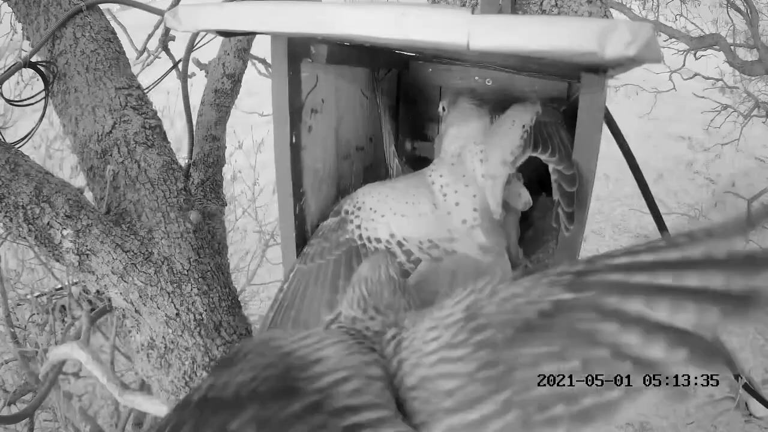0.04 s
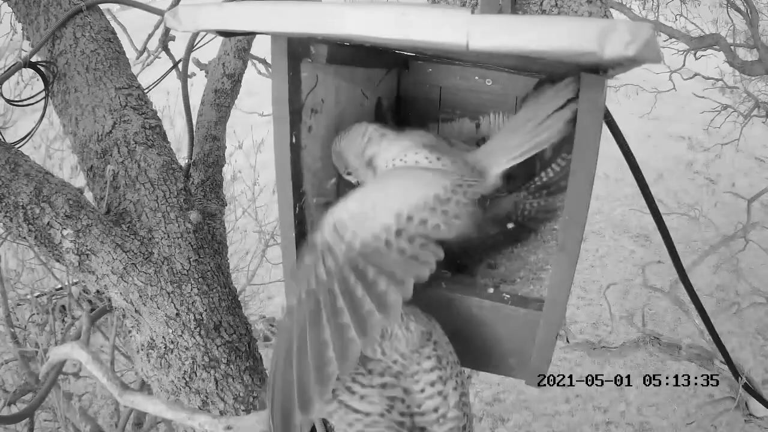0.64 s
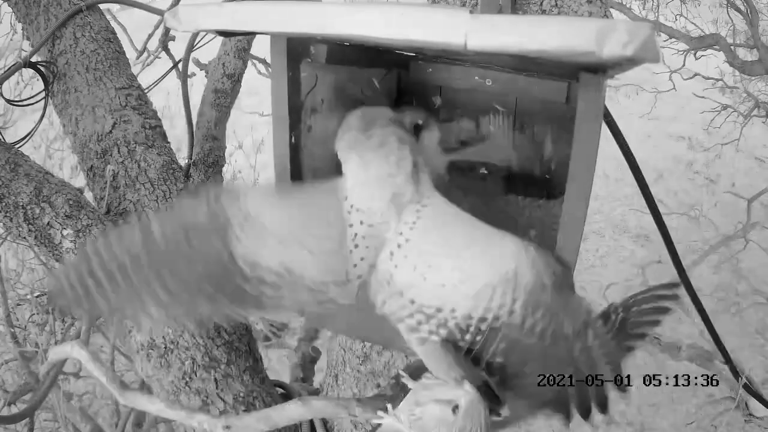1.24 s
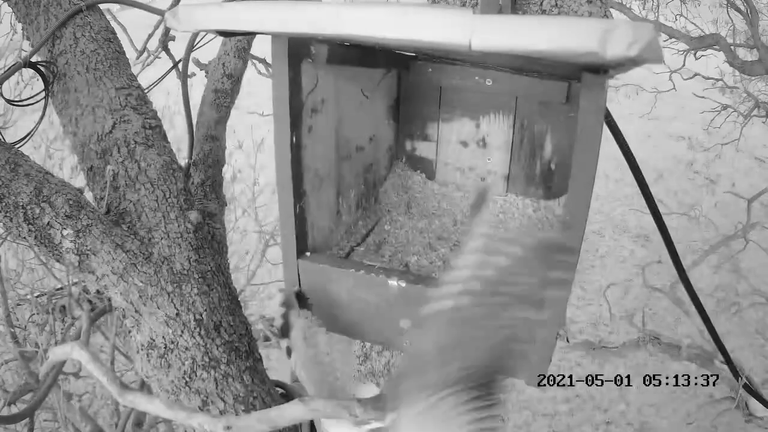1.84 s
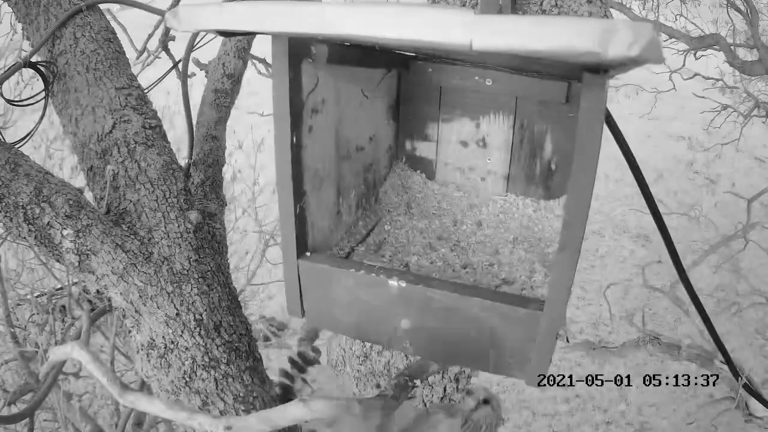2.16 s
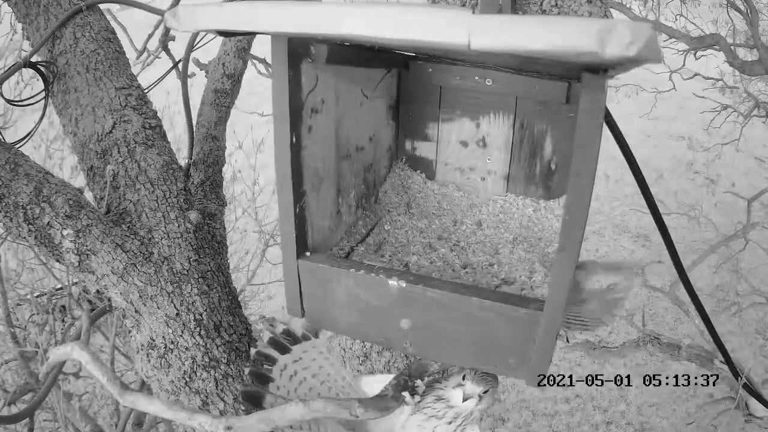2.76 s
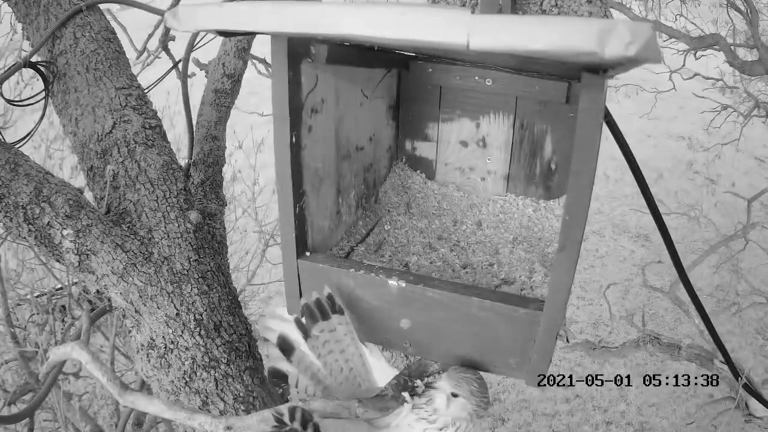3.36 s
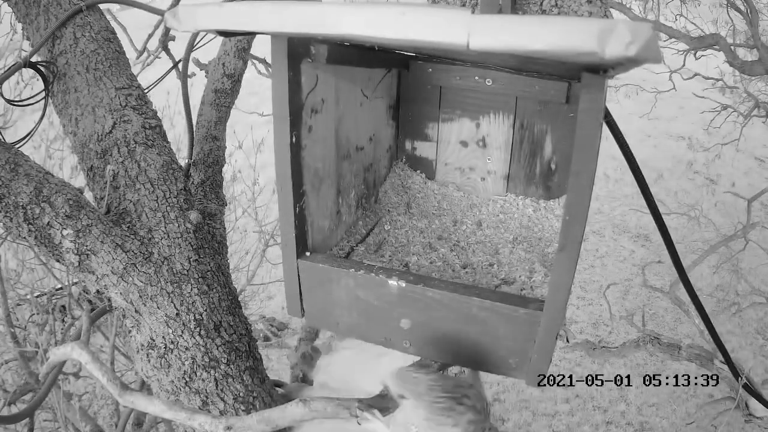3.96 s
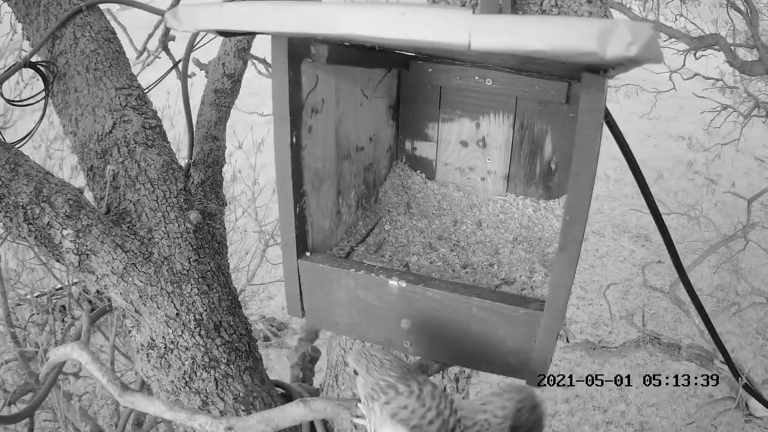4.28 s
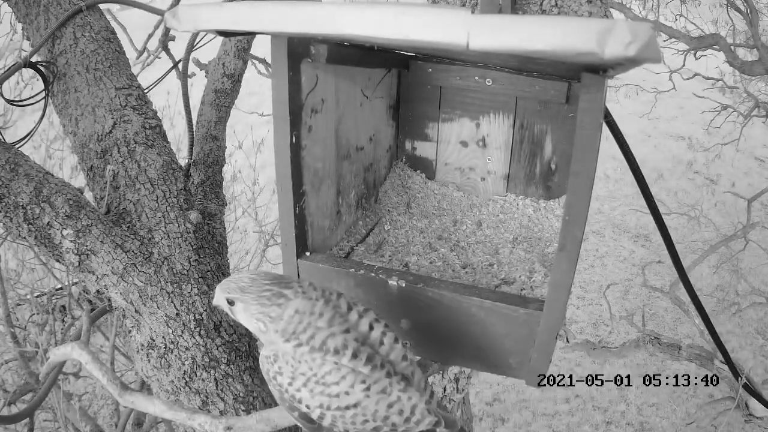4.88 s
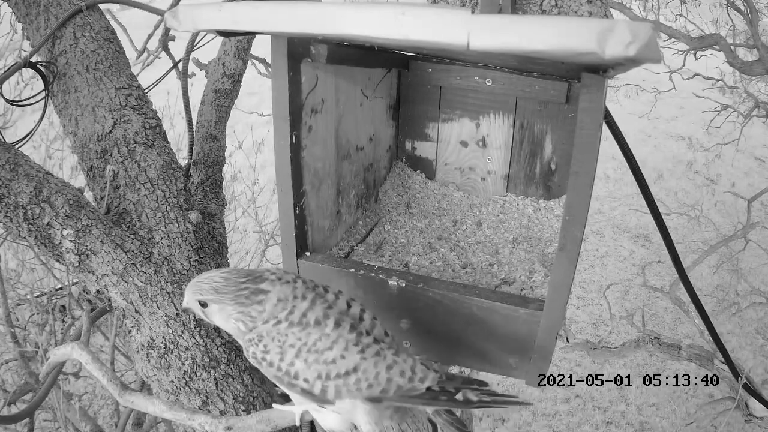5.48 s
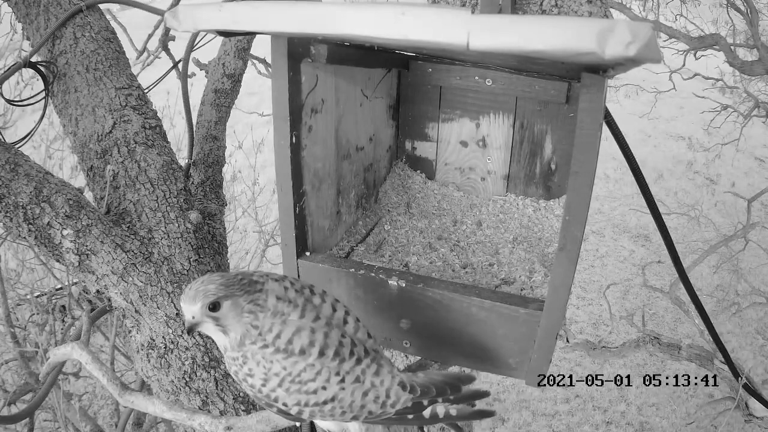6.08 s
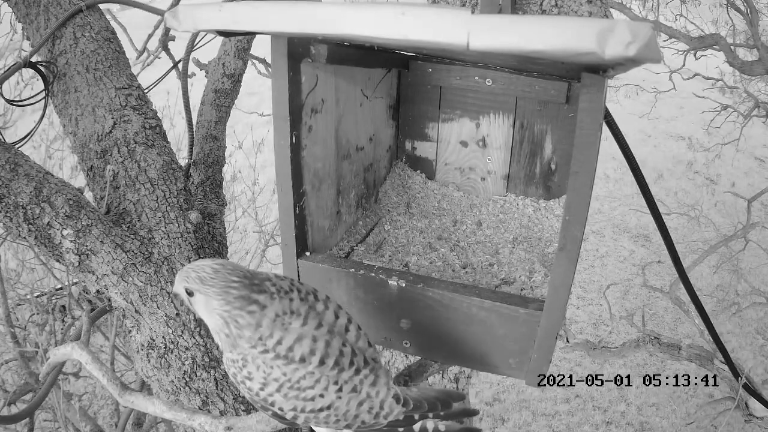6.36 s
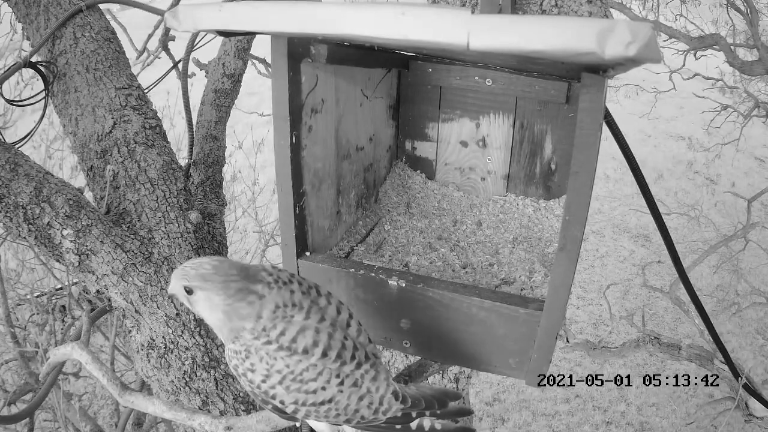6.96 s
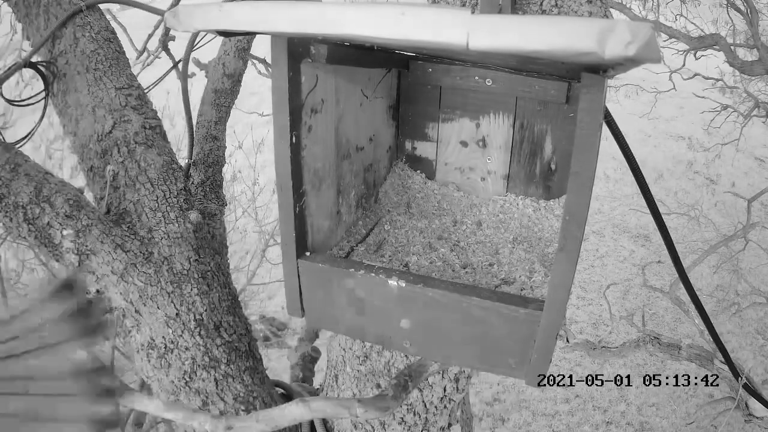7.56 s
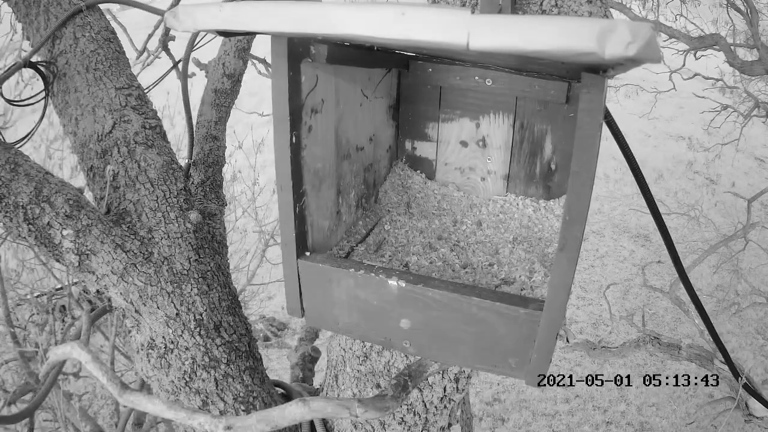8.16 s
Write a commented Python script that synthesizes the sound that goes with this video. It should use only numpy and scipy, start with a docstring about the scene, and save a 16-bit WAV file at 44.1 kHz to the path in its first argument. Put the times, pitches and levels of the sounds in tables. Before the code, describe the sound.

Two kestrels scream harshly and scuffle with beating wings at a wooden nest box, then scold each other in rapid, repeated calls.

```python
"""Two kestrels fight at a wooden nest box, close to the microphone, with harsh, broken screams.
Each voice is a strained syrinx tone that roughens and doubles its period, coloured by the throat.
Feathers rustle; wings and claws ring the boards. The birds tumble below the box and scold in long
'kee-kee-kee' series, one perched near, its rival farther off, then the perched one flies away.
Box and trunk answer quickly, the trees give a short echo, and a cuckoo calls far off in still air."""
import sys
import numpy as np
from scipy import signal
from scipy.fft import rfft, irfft, next_fast_len
from scipy.io import wavfile
from scipy.ndimage import uniform_filter1d, map_coordinates

SR = 44100
rng = np.random.default_rng(int(sys.argv[2]) if len(sys.argv) > 2 else 0)


def persist_wave(psi):
    """Save psi, clipped to +-1, as 16-bit WAV."""
    counts = np.round(np.clip(psi, -1, 1) * 32767).astype(np.int16)
    wavfile.write(sys.argv[1], SR, np.atleast_2d(counts).T)


N = 362943


def amp(db):
    return 10 ** (np.asarray(db) / 20)


def unit(x):
    """x scaled to rms 1."""
    return x / np.sqrt(np.mean(np.abs(x) ** 2) + 1e-20)


def along(points, hz):
    """A curve of (f/Hz, value) points, read on a log frequency axis."""
    freqs, values = np.transpose(points)
    return np.interp(np.log(hz + 1), np.log(freqs + 1), values)


def at(rows, s):
    """The columns of a control curve at time s."""
    times, *columns = np.transpose(rows)
    return [np.interp(s, times, column) for column in columns]


def wobble(rate, n):
    """A smooth random curve of n samples, rate knots a second."""
    knots = rng.standard_normal(int(n * rate / SR) + 4)
    return map_coordinates(knots, [np.arange(n) * rate / SR], mode="mirror")


def filtered(x, response):
    """x through a frequency response."""
    size = next_fast_len(len(x) + 8192)
    return irfft(rfft(x, size) * response(np.fft.rfftfreq(size, 1 / SR)), size)[:len(x)]


def noise(spectrum, n=N):
    """Coloured noise of rms 1."""
    return unit(filtered(rng.standard_normal(n), lambda hz: amp(along(spectrum, hz))))


def patchy(spectrum, patchy_db):
    """Noise of rms 1 whose colour shifts from moment to moment, as different feathers touch."""
    frames = signal.stft(noise(spectrum), nperseg=512)[2]
    patches = uniform_filter1d(rng.standard_normal(frames.shape), size=4, axis=0)
    patches = unit(uniform_filter1d(patches, size=4, axis=1))
    return unit(signal.istft(frames * amp(patchy_db * patches), nperseg=512)[1][:N])


def add(track, s, sound):
    """Mix a sound into the track at time s."""
    start = round(s * SR)
    part = sound[max(-start, 0):max(N - start, 0)]
    track[max(start, 0):][:len(part)] += part


def progress(length):
    """Runs from 0 to 1 over a note."""
    return np.linspace(0, 1, max(round(length * SR), 64))


def swell(u, rise, fall):
    """Soft-edged envelope of rms 1; rise and fall are shares of the note."""
    attack = np.sin(np.pi / 2 * np.clip(u / rise, 0, 1))
    release = np.sin(np.pi / 2 * np.clip((1 - u) / fall, 0, 1))
    return unit(attack * release)


def partials(pitch, multiples, rough, jitter=.028, chaos_rate=750):
    """Syrinx partials, one per row; roughness shakes the pitch and blurs each into a chaotic band."""
    n, rough = len(pitch), np.clip(rough, 0, 1)
    phase = 2 * np.pi * np.cumsum(pitch * (1 + jitter * rough * wobble(250, n))) / SR
    chaos = np.array([wobble(chaos_rate, n) + 1j * wobble(chaos_rate, n) for _ in multiples])
    blur = np.clip(rough * (multiples[:, None] / 3) ** (1 / 3), 0, 1)
    swing = np.sqrt(1 - blur ** 2) + blur * chaos * np.sqrt(.5)
    swing = unit(swing / np.sqrt(np.abs(swing)))  # the membranes limit their own swing
    return np.sqrt(2) * np.real(swing * np.exp(1j * multiples[:, None] * phase))


def overtone_db(pitch, even_hz, db_per_octave):
    """Overtones match the fundamental at even_hz; lower, they grow into the throat's resonance."""
    return np.clip(db_per_octave * np.log2(pitch / even_hz), -12, 12)


def sidebands(pitch, depth):
    """The other side of the syrinx beats unevenly against the tone."""
    beat_hz = pitch / 5 * amp(2 * wobble(70, len(pitch)))
    return 1 + depth * np.sin(2 * np.pi * np.cumsum(beat_hz) / SR)


# Resonance of a kestrel's throat: f/Hz, gain/dB
THROAT_RESPONSE = [(1100, -31), (2000, -1.5), (3000, -2.5), (4000, 7.5), (4600, 3.5), (5300, -1),
                   (6900, -19), (8000, -23), (11000, -36.5), (13000, -56)]
def voice(pitch, over_db, half_db, rough, rasp_db, tilt_db):
    """A fundamental plus throat-shaped overtones, period doubling and rasp; tilt is dB an octave."""
    def through_throat(multiples):
        column = multiples[:, None]
        gain = amp(along(THROAT_RESPONSE, column * pitch) + tilt_db * np.log2(column))
        return unit(np.sum(gain * partials(pitch, multiples, rough), axis=0))
    harmonics = np.arange(1, 7)
    fundamental = partials(pitch, harmonics[:1], .85 * rough)[0]
    rasp = noise(THROAT_RESPONSE, len(pitch))
    upper = amp(over_db) * through_throat(harmonics[1:]) + amp(half_db) * through_throat(harmonics - .5)
    return fundamental + upper + amp(rasp_db) * rough * np.sqrt(1 + np.mean(upper ** 2)) * rasp


# Screams at the box, close to the microphone:
# t/s, length/s, f/Hz, glide/share of f, broken tail/s, level/dB, roughness/0-1, period doubling/dB
FIGHT_SCREAMS = [(-.01, 0.073, 2594, -0.065, 0.025, -24.5, 0.23, -16.5),
                 (0.194, 0.063, 2528, 0.089, 0.0041, -22.5, 0.1, 3),
                 (0.257, 0.079, 2530, 0.018, 0, -27, 0.25, -3),
                 (0.315, 0.031, 2596, 0.055, 0.0037, -31, 0.82, -6),
                 (0.342, .026, 2088, -0.0024, 0.01283, -24, 0.26, -7),
                 (.461, 0.052, 2638, 0.13, 0.0029, -30, 0.12, -6.5),
                 (.53, 0.066, 2822, -0.034, 0.024, -25, 0.33, -1.5),
                 (0.727, 0.046, 2920, 0.05, 0.01, -20.5, 0.19, 1),
                 (0.798, 0.056, 2570, -0.16, 0.028, -24, 0.33, 3),
                 (.955, 0.047, 2533, -0.047, 0.016, -23, 0.16, 2),
                 (1.258, 0.036, 2256, .18, 0, -20, 0.26, -14),
                 (1.322, 0.04, 2522, -0.0685, 0.013, -12, 0.42, 12),
                 (1.47, .05, 2486, -0.044, .014, -17.5, 0.4, 1),
                 (1.622, 0.032, 2080, 0.17, 0, -25, 0.54, -7.5),
                 (1.679, 0.027, 1998, -0.07, 0.0016, -23.5, 0.42, -4),
                 (1.804, 0.0481, 2313, 0.06, 0.0051, -28, 0.8, -5),
                 (1.875, 0.044, 2110, 0.048, 0, -28.5, 0.58, -1),
                 (1.923, 0.041, 2310, -0.067, 0.026, -27.5, 0.39, -14),
                 (2.082, 0.056, 2230, -0.072, 0.013, -34.5, 0.37, -15.5)]
def screams(break_s=.0067, break_drop=.18, bow=.019, waver=.02, sag_db=6, crest=.44):
    """A ragged tone clears, doubles its period under pressure, then breaks lower and brighter."""
    out = np.zeros(N)
    for s, length, hz, glide, tail, db, rough, half_db in FIGHT_SCREAMS:
        u = progress(length)
        edge = (2 * u - 1) ** 2  # 1 at both ends, 0 midway
        broken = np.clip((tail - length * (1 - u)) / break_s, 0, 1)
        ragged = np.clip(rough * (1 + edge) + .3 * edge ** 2 + .15 * broken, 0, 1)
        arch = bow * (np.mean(edge) - edge) * (1 + rng.standard_normal())
        pitch = hz * (1 + glide * (u - .5) + arch) * (1 - break_drop * broken)
        pitch *= 1 + waver * (.8 * wobble(70, len(u)) + 2 * ragged * wobble(190, len(u)))
        over_db = overtone_db(pitch, even_hz=2272, db_per_octave=-38.5)
        doubling_db = half_db - 22 * edge ** 2 - 5 * broken
        cry = voice(pitch, over_db, doubling_db, ragged, rasp_db=-11.5, tilt_db=-4.5)
        cry *= sidebands(pitch, .53 * rough)
        cry = unit(cry / np.sqrt(1 + amp(over_db) ** 2 + amp(half_db) ** 2))
        flutter_db = (1 + 2 * ragged) * wobble(220, len(u))
        pressure = unit(swell(u, rise=.11, fall=.22) * amp(flutter_db - sag_db * np.abs(u - crest)))
        add(out, s, amp(db) * pressure * cry)
    return out


# Feathers brushing close by: f/Hz, level/dB
FEATHER_SPECTRUM = [(40, -20.5), (280, -2.5), (1300, 0), (2500, -5), (4500, -17), (7000, -40), (13000, -44)]
# Air pushed against the microphone: f/Hz, level/dB
DRAUGHT_SPECTRUM = [(40, -4.5), (90, -17), (9000, -73)]
# Rustle of the struggle at the box: t/s, level/dB
RUSTLE_CURVE = [(0.0, -47), (0.601, -58), (1.001, -41), (1.058, -54.5), (1.47, -47.5), (2.032, -44.5),
                (2.13, -51.5), (2.341, -70), (2.897, -69.5)]
# Wing strokes that fan the microphone, the last two at take-off: t/s, level/dB
WING_STROKES = [(1.585, -35), (7.488, -40), (7.608, -35)]
def wings():
    """Feathers brush in short, separate scratches and fan the microphone."""
    rustle = amp(np.interp(np.arange(N) / SR, *np.transpose(RUSTLE_CURVE), right=-120))
    flaps = unit(amp(7 * np.tanh(wobble(55, N))))
    grain = unit(amp(4.5 * wobble(400, N)))
    draught = amp(-11) * rustle
    u = progress(.2006)
    for s, db in WING_STROKES:
        add(draught, s, amp(db - 34.4 * u) * swell(u, rise=.025, fall=.25))
    scratches = rustle * flaps * grain * patchy(FEATHER_SPECTRUM, patchy_db=5.5)
    return scratches + draught * noise(DRAUGHT_SPECTRUM)


# Short chips close by: t/s, length/s, f/Hz, glide/share of f, level/dB
CHIP_NOTES = [(0.088, 0.019, 1134, -0.079, -38), (0.174, 0.013, 2300, 0.26, -34.5),
              (0.413, 0.028, 1290, 0.17, -41.5), (0.439, 0.0219, 1124, -0.21, -36.5),
              (0.599, 0.0624, 1008, -0.23, -41), (0.858, 0.031, 882, -0.15, -35),
              (.696, 0.014, 2366, 0.31, -35), (1.062, 0.0541, 1105, 0.17, -38.5),
              (2.79, 0.016, 1520, -0.109, -27), (4.809, .0153, 1441, -0.008, -30.5),
              (6.017, 0.021, 1105, 0.21, -36.5), (6.175, 0.038, 1030, 0.25, -41.5),
              (6.213, 0.022, 1127, -0.16, -33.5)]
def chips(even_hz=1259.5, rough_per_s=27):
    """Abrupt low notes whose upper partials fall away quickly; the long ones get ragged."""
    out, harmonics = np.zeros(N), np.arange(1, 8)
    for s, length, hz, glide, db in CHIP_NOTES:
        u = progress(length)
        second_db = overtone_db(hz, even_hz, db_per_octave=-16)
        upper_db = second_db - 14 - 10 * (harmonics[2:] - 3) * hz / even_hz
        pitch = hz * (1 + glide * (u - .5))
        rough = min(rough_per_s * length, .5)
        chip = amp(np.r_[0, second_db, upper_db]) @ partials(pitch, harmonics, rough)
        add(out, s, amp(db) * swell(u, rise=.27, fall=.27) * unit(chip))
    return out


# Wings and claws on the box, beside the microphone, the last one just below it: t/s, level/dB, contact t60/s,
# board ring/dB
BOX_BLOWS = [(0.328, -43, 0.039, -35), (1.054, -35.5, 0.04, -29), (1.162, -12, 0.011, -39),
             (1.239, -26, 0.04, -37.5), (1.262, -35, 0.069, -28), (1.433, -27, 0.057, -26.5),
             (1.474, -29, 0.054, -33), (1.523, -26.5, 0.034, -39.5), (1.582, -14.5, 0.015, -35.5),
             (1.6, -28, 0.082, -34.5), (1.825, -27, 0.046, -45)]
def blows(box_hz=247, box_t60=.11, claw_t60=.025):
    """A crunch of feathers rings the boards and pushes air; the shortest blows are claws and click."""
    force, claws, boards = np.zeros((3, N))
    t = np.arange(SR // 6) / SR
    for s, db, t60, boards_db in BOX_BLOWS:
        decay = amp(-60 * t / t60) + amp(-26 - 60 * t / (3 * t60))
        contact = (1 - np.exp(-t / .0015)) * decay * amp(3.5 * wobble(200, len(t)))
        add(force, s, amp(db) * contact)
        if t60 < claw_t60:
            add(claws, s, amp(db - 28.5) * contact)
        ring = amp(-60 * t / box_t60) * np.sin(2 * np.pi * box_hz * t + 1.3 * wobble(60, len(t)))
        add(boards, s, amp(boards_db) * (1 - np.exp(-t / .0013)) * ring)
    crunch = patchy(FEATHER_SPECTRUM, patchy_db=1)
    clicks = claws * rng.standard_normal(N)
    return boards + clicks + force * (crunch + amp(-14.5) * noise(DRAUGHT_SPECTRUM))


# Feet and wing tips on nearby wood: t/s, f/Hz, level/dB, t60/s
LIGHT_KNOCKS = [(1.193, 865, -33.5, 0.027), (2.592, 817, -41.5, 0.085), (3.821, 956, -45.5, 0.069),
                (3.955, 803, -48, 0.073), (4.304, 1104, -44.5, 0.048)]
# Modes of that wood: multiple of f, level/dB
WOOD_MODES = [(.6, 4.5), (1, 5), (1.5, -8)]
def knocks():
    """Each knock rings a few damped, blurred modes of the wood it lands on."""
    out, t = np.zeros(N), np.arange(SR // 6) / SR
    for s, hz, db, t60 in LIGHT_KNOCKS:
        ring = sum(amp(mode_db) * np.sin(2 * np.pi * multiple * hz * t + wobble(10 / t60, len(t)))
                   for multiple, mode_db in WOOD_MODES)
        add(out, s, amp(db - 60 * t / t60) * (1 - np.exp(-20 * t / t60)) * ring)
    return out


# Thin squeaks over the close cries: t/s, length/s, f/Hz, level/dB
HIGH_SQUEAKS = [(1.253, 0.0094, 5310, -31.5), (1.317, 0.015, 5480, -24.5), (1.666, 0.028, 5100, -36),
                (7.002, 0.029, 5260, -43.5)]
def squeaks(drop=.086):
    """The other side of the syrinx slips in with a high, falling whistle of its own."""
    out = np.zeros(N)
    for s, length, hz, db in HIGH_SQUEAKS:
        u = progress(length)
        whistle = partials(hz * (1 - drop * (u - .5)), np.ones(1), rough=.067)[0]
        add(out, s, amp(db) * swell(u, rise=.63, fall=.57) * whistle)
    return out


# Feathers heard from below the box: f/Hz, level/dB
MUFFLED_SPECTRUM = [(40, -5), (170, -9.5), (280, -1), (1250, -5), (1800, -22), (6000, -60)]
# Wing beats below the box: t/s, thump/dB, t60/s, quill crackle/dB
WING_BEATS = [(2.1, -19, 0.031, -42), (2.255, -38.5, 0.05, -33.5), (2.311, -48, 0.076, -38.5),
              (3.473, -47, 0.099, -57), (3.647, -35.5, 0.15, -70.5), (3.844, -40, 0.13, -45.5),
              (3.873, -23, 0.035, -38), (4.102, -41, 0.26, -57.5), (4.248, -28.5, 0.051, -34),
              (4.395, -38.5, 0.12, -35)]
def tussle(attack_s=.005):
    """Wings beat unevenly: a muffled thump each time, and a crackle where the quills scrape."""
    force, scrape = np.zeros((2, N))
    t = np.arange(SR // 6) / SR
    for s, db, t60, quills_db in WING_BEATS:
        beat = (1 - np.exp(-t / attack_s)) * amp(-60 * t / t60)
        add(force, s, amp(db) * beat)
        add(scrape, s, amp(quills_db) * beat)
    thumps = force * unit(amp(5 * wobble(200, N))) * patchy(MUFFLED_SPECTRUM, patchy_db=5)
    crackle = scrape * unit(amp(5.4 * wobble(600, N))) * noise(FEATHER_SPECTRUM)
    return thumps + crackle


# A cuckoo far from the box: t/s, level/dB
CUCKOO_CALLS = [(2.81, -75), (5.28, -63.5), (6.48, -63.5), (7.68, -66.5)]
# Its two notes: delay/s, length/s, f/Hz
CUCKOO_SYLLABLES = [(0, 0.12, 637.7), (0.259, 0.15, 525.6)]
def cuckoo():
    """Soft, nearly pure notes that sag a little, blurred by distance."""
    out = np.zeros(N)
    for delay, length, hz in CUCKOO_SYLLABLES:
        u = progress(length)
        pitch = hz * (1 - .04 * (u - .5) + .028 * wobble(80, len(u)))
        note = swell(u, rise=.33, fall=.58) * np.sin(2 * np.pi * np.cumsum(pitch) / SR)
        for s, db in CUCKOO_CALLS:
            add(out, s + delay, amp(db) * note)
    return out


# The rival's two series, farther from the microphone: start/s, end/s, first gap/s, gap change per call/s
RIVAL_SERIES = [(3.218, 5.63, .157, -.00014), (6.515, 8.16, .167, .0015)]
# Its effort: t/s, fundamental level/dB, top f/Hz
RIVAL_EFFORT = [(3.2, -55, 2239), (3.8, -63.5, 2335), (4.8, -65, 2250), (5.3, -54, 2376), (7, -54.5, 2359),
                (8.1, -54, 2287)]
def rival(call_s=.114, leap=.17, leap_s=.011, slide=.21, slide_from=.28):
    """Even series of calls that leap up, then slide down and grow hoarse on the way."""
    out, u = np.zeros(N), progress(call_s)
    sliding = np.maximum(u - slide_from, 0) / (1 - slide_from)
    rough = .17 + .6 * sliding ** 1.5 + .6 * (1 - u) ** 12
    contour = 1 - leap * np.exp(-u * call_s / leap_s) - slide * sliding ** 1.25
    for s, end, gap, growth in RIVAL_SERIES:
        while s < end:
            db, top_hz = at(RIVAL_EFFORT, s)
            pitch = top_hz * (contour + .01 * wobble(12, len(u)) + .03 * rough * wobble(250, len(u)))
            tilt_db = np.interp(s, [4.5, 6.5], [-4, 2])  # later calls are brighter
            call = voice(pitch, over_db=7.5, half_db=-39, rough=rough, rasp_db=-7.5, tilt_db=tilt_db)
            flutter_db = 3.2 * wobble(150.7, len(u))
            add(out, s, amp(db + flutter_db) * swell(u, rise=.35, fall=.8) * call)
            s, gap = s + gap, gap + growth
    return out


# The perched bird, near the microphone: t/s, length/s, top f/Hz
PERCHED_CALLS = [(4.592, 0.12, 2080), (4.748, 0.086, 2313), (4.894, 0.089, 2334), (5.033, 0.09496, 2148),
                 (5.173, 0.088, 2410), (5.316, 0.054, 2380), (5.46, 0.058, 2400), (5.61, 0.071, 2408),
                 (5.757, 0.093, 2360), (5.905, 0.12, 2200), (6.056, 0.11, 2204), (6.203, 0.1, 2186),
                 (6.356, 0.1, 2280), (6.498, 0.1296, 2210), (6.66, 0.1, 2283), (6.816, 0.1, 2130),
                 (6.984, 0.094, 2168)]
# Its effort: t/s, fundamental level/dB, overtones/dB over the fundamental, hoarseness (0 is clear)
PERCHED_EFFORT = [(4.59, -46.5, 8.5, 0.22), (4.75, -42, 12, 0.06), (5.3, -42, 12, 0.11),
                  (5.8, -49.5, 4, 0.9), (6.3, -56, 12, 1.19), (7, -52, 9.5, 0.7)]
# Arch of one 'kee': share of its length, share of the way from slack to top pitch
KEE_ARCH = [(0, 0), (.17, 0.8), (.42, 1.04), (1, 0.38)]
def perched(slack_hz=1660, crack_s=.0062, crack_drop=.055):
    """Each arched call cracks: the pitch steps down, the period doubles. Hoarse calls crack early."""
    out = np.zeros(N)
    for s, length, top_hz in PERCHED_CALLS:
        u = progress(length)
        db, over_db, hoarse = at(PERCHED_EFFORT, s)
        crack_at = .56 - .15 * hoarse + .044 * rng.standard_normal()
        crack = np.clip((u - crack_at) * length / crack_s, 0, 1)
        rough = .08 + .13 * hoarse + crack * (.1 + .12 * hoarse) + .45 * (2 * u - 1) ** 4
        waver = (.007 + .012 * hoarse + .004 * crack) * wobble(170, len(u))
        flutter_db = (1.4 + hoarse + .7 * crack) * wobble(230, len(u))
        doubling_db = -13 - 5 * hoarse + (15 + 5 * hoarse) * crack + 3 * wobble(40, len(u))
        arch = uniform_filter1d(at(KEE_ARCH, u)[0], size=400, mode="nearest")
        pitch = (slack_hz + (top_hz - slack_hz) * arch) * (1 - crack_drop * crack + waver)
        tilt_db = 8 - 11.7 * hoarse
        call = voice(pitch, over_db - 4 * crack, doubling_db, rough, rasp_db=-1.5, tilt_db=tilt_db)
        call *= sidebands(pitch, .181 * crack * hoarse)
        add(out, s, amp(db + flutter_db) * swell(u, rise=.64, fall=.998) * call)
    return out


# The rival's whines, farther off: start/s, end/s, f/Hz, fundamental level/dB, overtones/dB over it
RIVAL_WHINES = [(6.898, 7.187, 1996, -63, 8), (7.461, 7.66, 2081, -53, -3.5),
                (7.654, 7.857, 2260, -59, 15.5), (8.016, 8.283, 2064, -59.5, 3)]
def whines():
    """Thin, clear drawn-out notes that climb slowly and drop at the end."""
    out = np.zeros(N)
    for start, end, hz, db, over_db in RIVAL_WHINES:
        u = progress(end - start)
        pitch = hz * (1 + .09 * u - .17 * u ** 7 + .005 * wobble(40, len(u)))
        doubling_db = -11 + 4 * wobble(15, len(u))
        whine = voice(pitch, over_db, doubling_db, rough=.18, rasp_db=-10, tilt_db=-5)
        add(out, start, amp(db) * swell(u, rise=.1, fall=.1) * whine)
    return out


def echo(x, decays):
    """Scattered reflections: a half-second noise tail, each band dying at its own t60."""
    hz, t, frames = signal.stft(rng.standard_normal(SR // 2), SR, nperseg=256)
    tail = signal.istft(frames * amp(-60 * t / along(decays, hz)[:, None]), SR, nperseg=256)[1]
    delayed = np.pad(x, (100, 0))
    return signal.fftconvolve(delayed, tail / np.linalg.norm(tail))[:N]


# Still air around the box: f/Hz, level/dB
AIR_SPECTRUM = [(30, -7.5), (3000, -22), (7000, -37)]
# Quick answer of box and trunk, next to the microphone: f/Hz, t60/s
BOX_DECAY = [(500, 0.19)]
# Faint echo from the surrounding trees: f/Hz, t60/s
TREE_DECAY = [(500, 0.94), (4000, 0.99), (10000, 0.018)]
def scene():
    """Birds and scuffle as heard from the box, with their echoes, over still air."""
    fight = screams() + chips() + squeaks()
    near = perched()
    far = rival() + whines()
    scuffle = blows() + wings() + tussle() + knocks()
    air = amp(-79) * noise(AIR_SPECTRUM)
    early = echo(amp(-25) * fight + amp(-14) * (near + scuffle) + amp(-11) * far, BOX_DECAY)
    late = echo(amp(-30) * near + amp(-25) * far + amp(-40) * fight + amp(-18) * scuffle, TREE_DECAY)
    return (fight + near + far + scuffle + early + late + cuckoo() + air)[None]


def record(dry):
    """Mono output, with the loudest peaks softly limited and the top treble cut."""
    ceiling, top_hz = .75, 12900
    rounded = dry[0] / (1 + (dry[0] / ceiling) ** 6) ** (1 / 6)
    return filtered(rounded, lambda hz: hz < top_hz)[None]


dry = scene()
out = record(dry)
persist_wave(out)
```